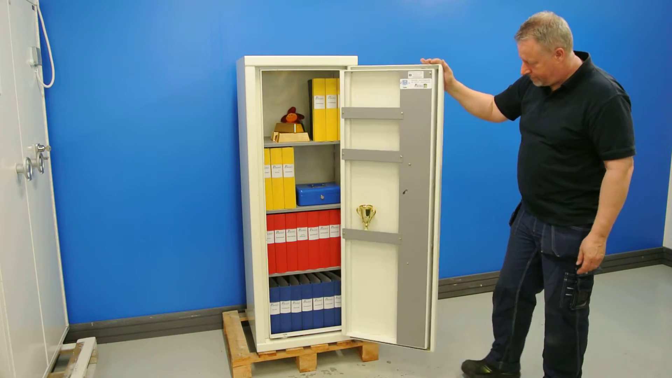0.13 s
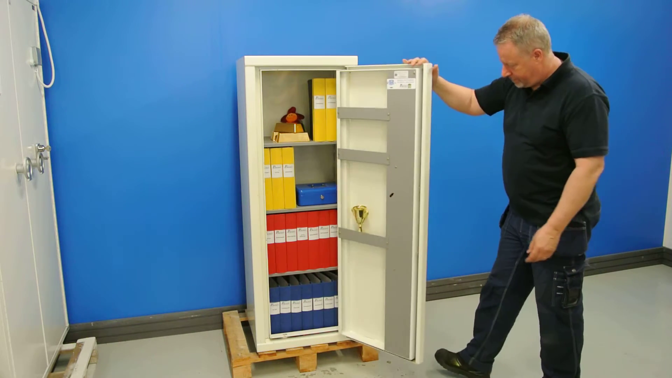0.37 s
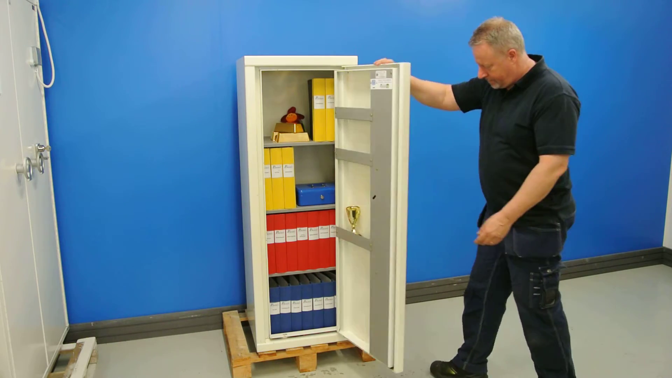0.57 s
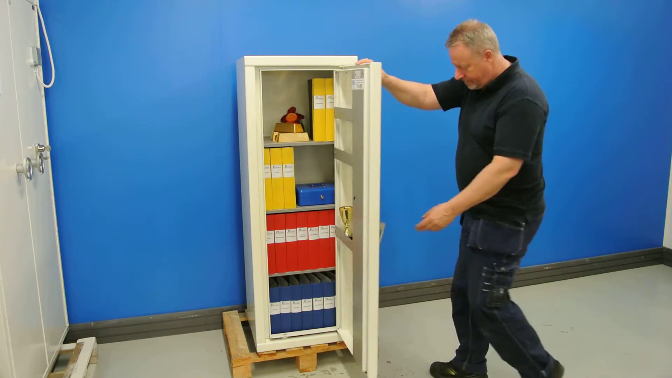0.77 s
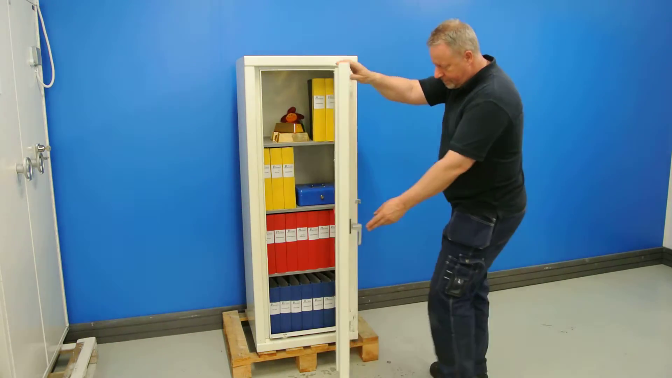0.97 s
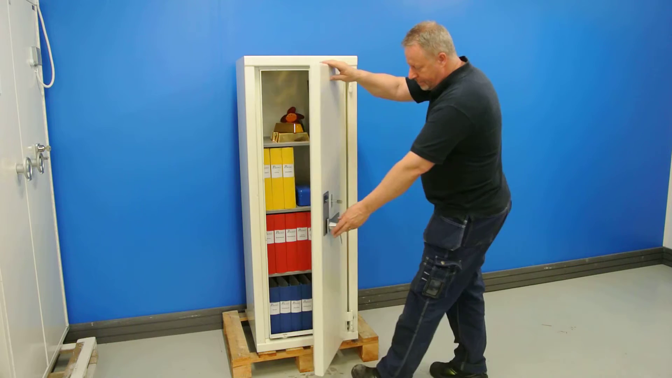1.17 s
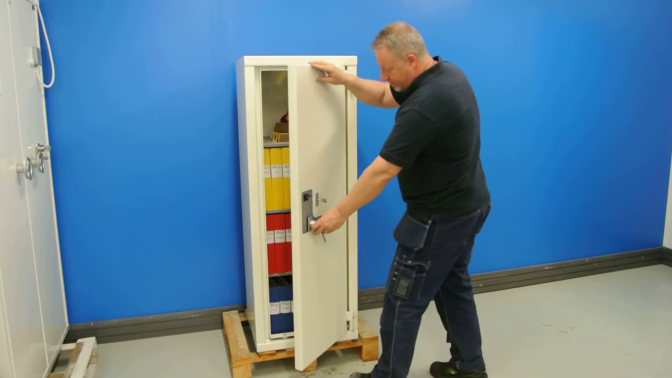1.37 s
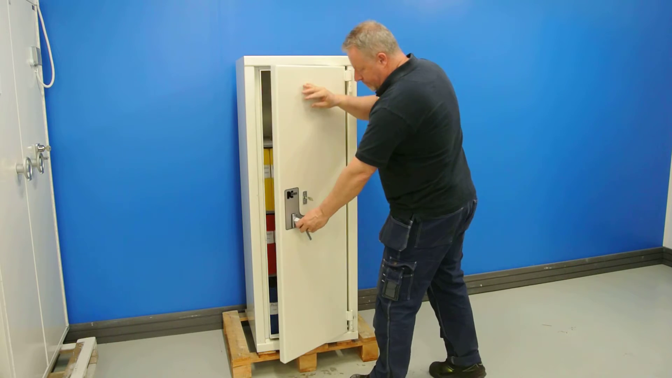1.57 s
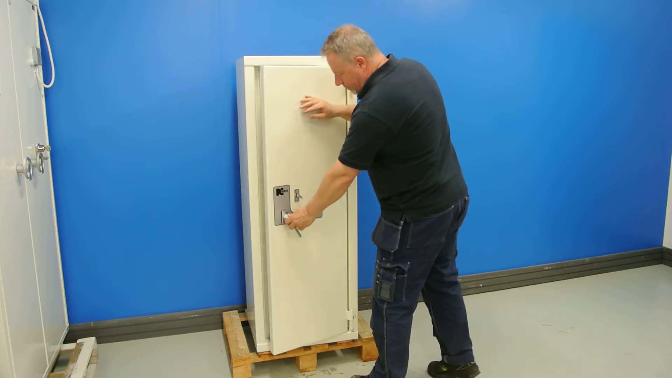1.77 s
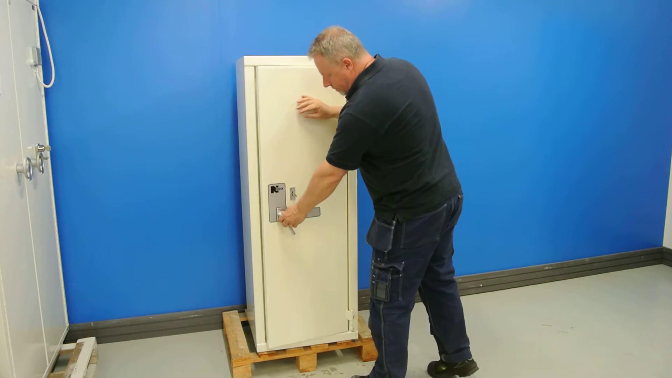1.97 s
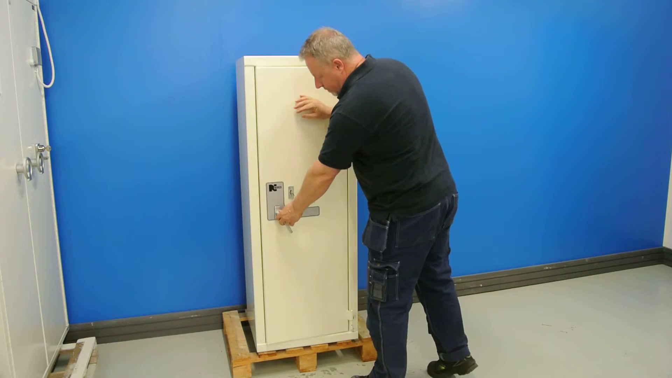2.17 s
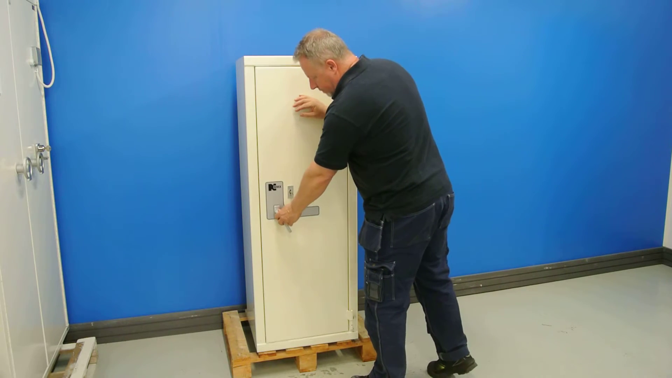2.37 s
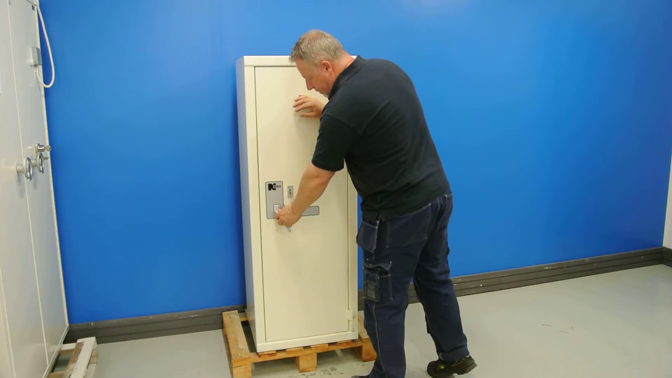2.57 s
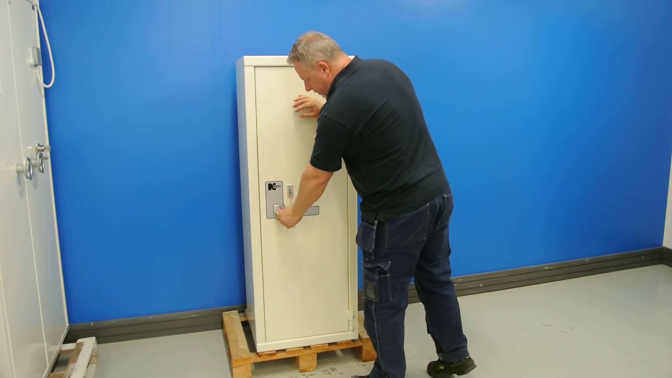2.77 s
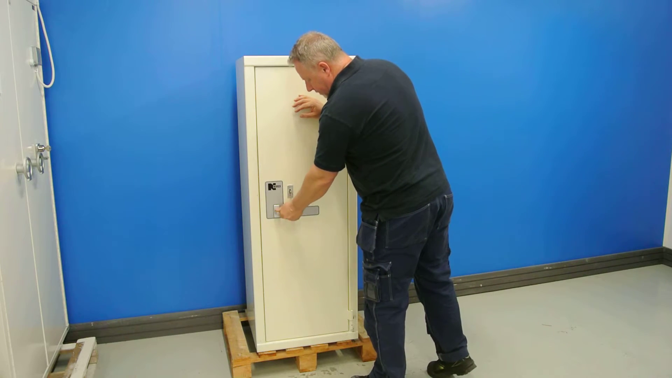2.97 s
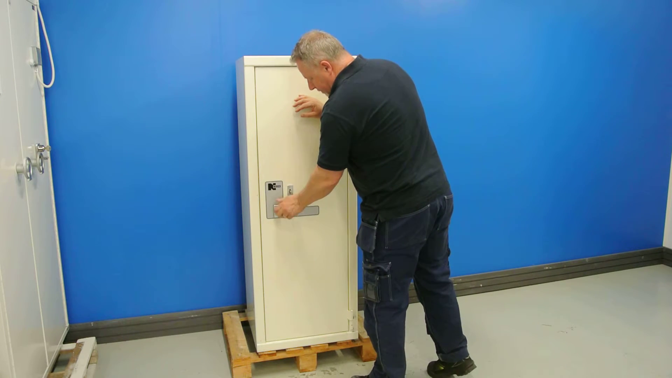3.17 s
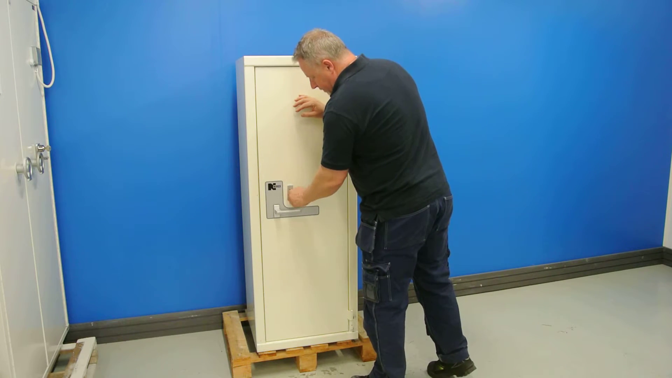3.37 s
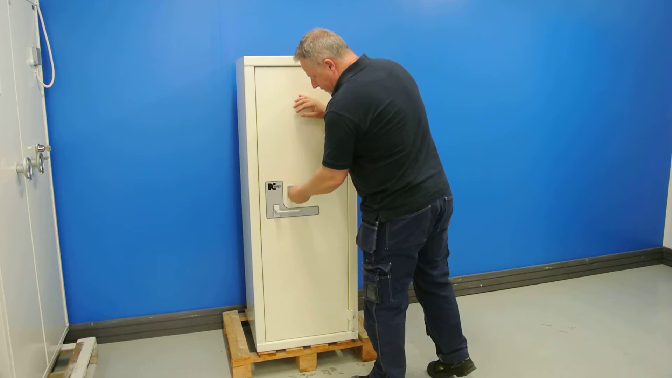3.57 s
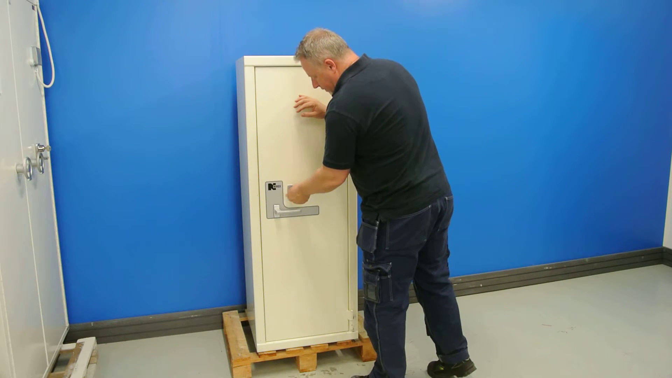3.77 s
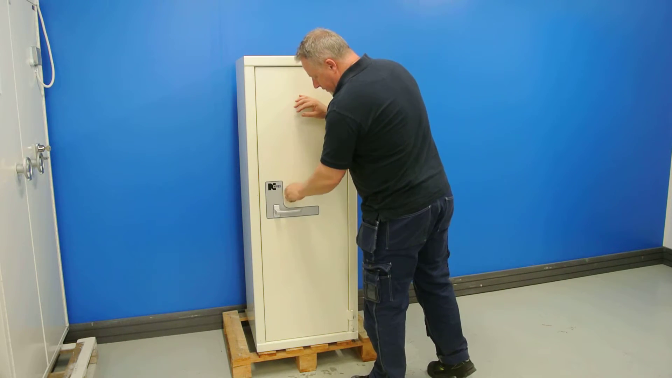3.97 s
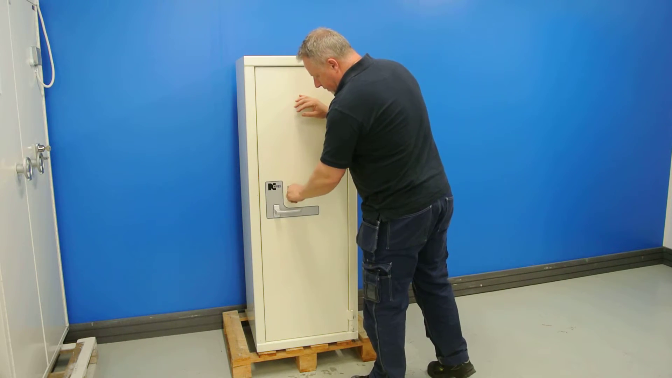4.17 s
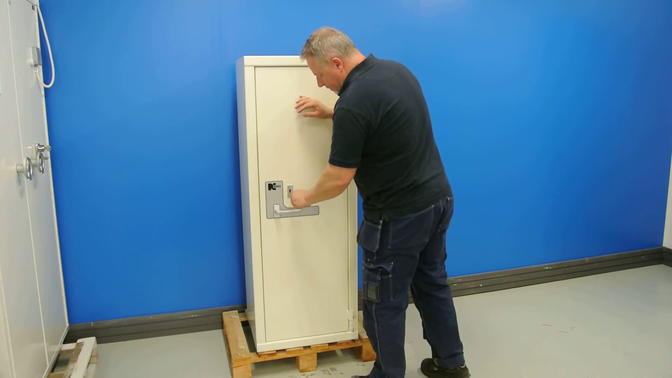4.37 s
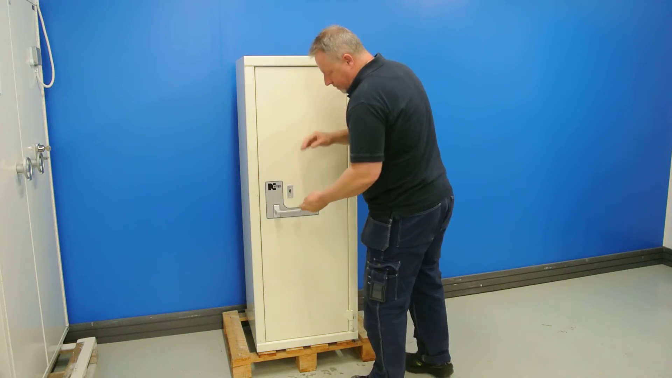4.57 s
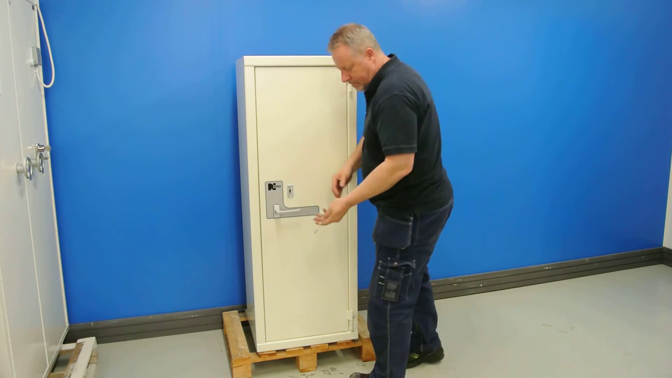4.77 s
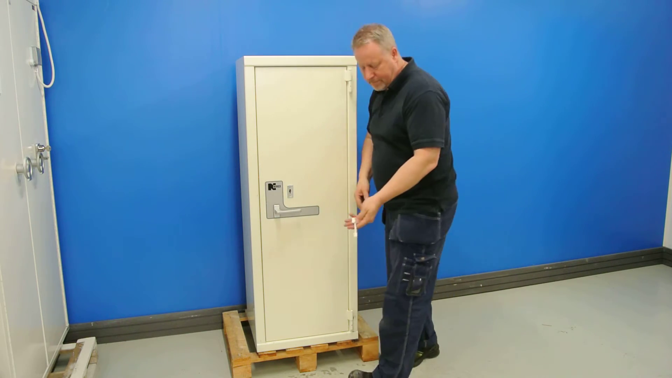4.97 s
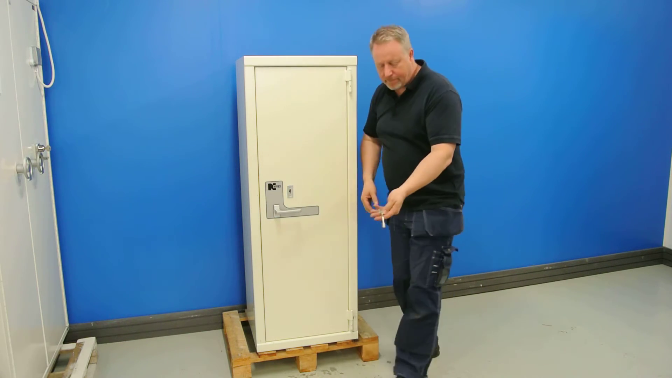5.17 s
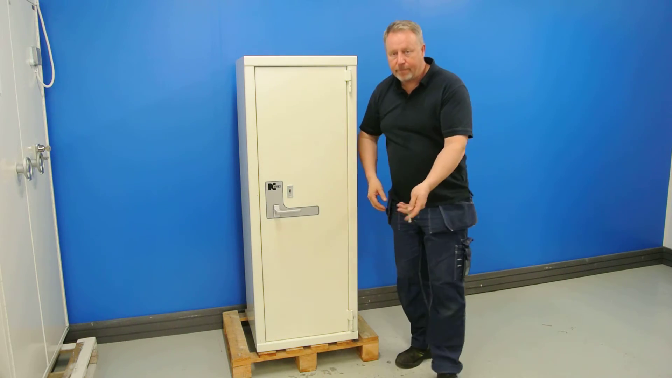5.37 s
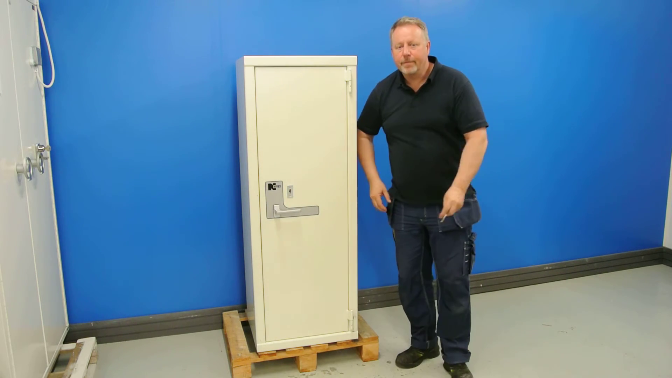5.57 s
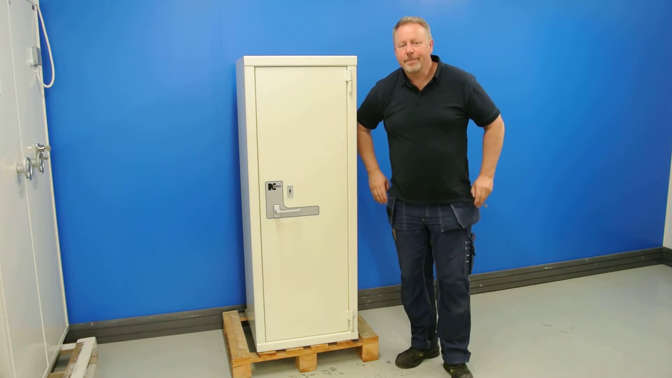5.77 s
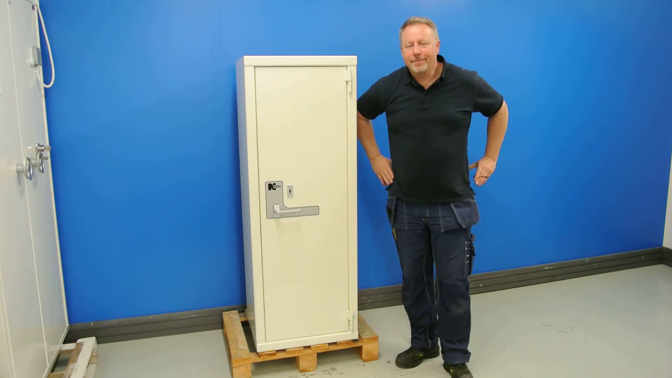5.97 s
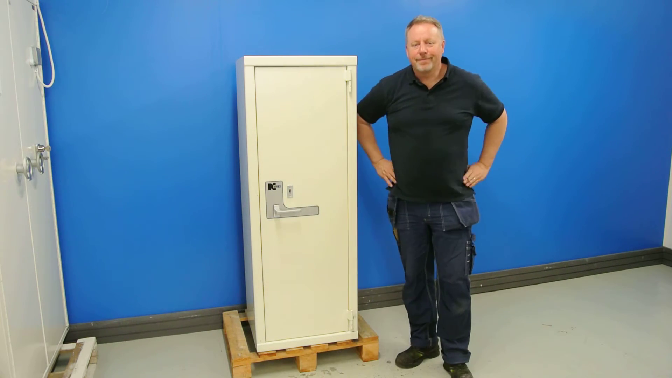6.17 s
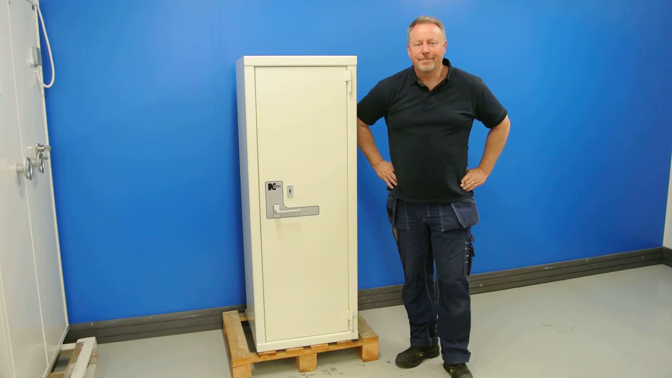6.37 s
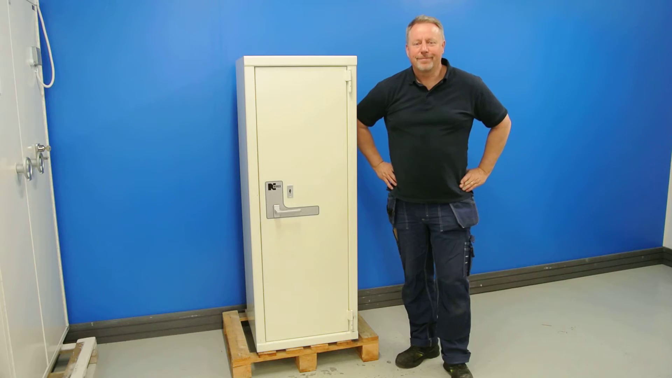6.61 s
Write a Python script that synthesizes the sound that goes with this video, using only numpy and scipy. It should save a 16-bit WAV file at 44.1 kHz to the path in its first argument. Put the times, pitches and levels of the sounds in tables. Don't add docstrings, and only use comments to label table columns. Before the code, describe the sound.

A bare, hard workshop with low ventilation, faint fan hum and slight hiss, heard in stereo from a few metres. Clothes rustle and boots tread softly; around 0.6-0.8 s a heel lands and a sole scuffs with a brief climbing squeal. A loose handle knocks at 1.0 and 1.3 s, with faint drags until a near-quiet pause. At 2.7 s the heavy steel door slams, rattling and bouncing for 0.15 s, sheets ringing and air thumping. At 3.0 s the bolts shoot home in the loudest, sharpest metallic crash, with about a second of room echo. Smaller linkage clacks come at 3.4 and 3.5-3.6 s. A key clicks in at 4.0 s, tumblers tick from 4.15, and the lock snaps at 4.3 with a tiny high ring and dull thunk. From 4.8 to 5.8 s heels step, soles scuff grittily and cloth swishes, strongest near 5.5, then fade.

```python
import sys
import numpy as np
from scipy import signal
from scipy.fft import rfft, irfft, next_fast_len
from scipy.io import wavfile
from scipy.ndimage import uniform_filter1d

SR = 44100
rng = np.random.default_rng(int(sys.argv[2]) if len(sys.argv) > 2 else 0)


def volts_from_decibels(level):
    exponent = np.asarray(level, float) / 20
    return 10 ** exponent


def pcm_store(signal):
    levels = np.round(np.clip(np.atleast_2d(signal), -1, 1) * 32767)
    wavfile.write(sys.argv[1], SR, levels.astype(np.int16).T)


N = 292905
SIZE = next_fast_len(N + 2 * SR)
HZ = np.arange(SIZE // 2 + 1) * SR / SIZE + 1e-3
TIME = np.arange(N) / SR

# t/s, bolt work level/dB, panel level/dB, small part level/dB
SLAM = [
    (2.704, -10.5, -8, -33),
    (2.7115, -17, -24, -34),
    (2.7455, -37, -20, -42),
    (2.761, -22, -43, -35),
    (2.7925, -33, -13, -46),
    (2.8242, -21, -17, -50),
    (2.8572, -49, -19.5, -54),
]
BOLT_SHOT = [
    (2.990, -1.5, -11, -5),
    (3.014, -20, -20.5, -28),
]
BOLTS = [
    (3.3608, -59, -38.5, -30),
    (3.3735, -27.5, -43, -25),
    (3.5215, -24, -51, -24.5),
    (3.5368, -18, -33, -44),
    (3.5474, -21, -32, -43),
    (3.5932, -19.5, -30.5, -14),
    (3.6055, -22, -31, -21),
]
LOCK = [
    (4.0302, -25, -36.5, -16),
    (4.1365, -30.5, -36, -25.5),
    (4.1545, -32.5, -48, -19),
    (4.2083, -28, -48, -26.5),
    (4.2295, -29.5, -34, -24),
    (4.2626, -35, -50, -24),
    (4.2829, -50, -52, -14.5),
    (4.293, -40, -54, -22),
    (4.3008, -26.5, -49, -15.5),
    (4.3248, -37, -30, -13.5),
]
# t/s, level/dB
KEY_BLOWS = [
    (4.2908, -14.5),
]
DOOR_BLOWS = [
    (2.704, -29),
    (2.800, -30),
]
FRAME_BLOWS = [
    (3.600, -38.5),
    (4.328, -33),
]
THUNKS = [
    (3.597, -30),
    (4.326, -23.5),
    (4.342, -30),
]
HANDLE_KNOCKS = [
    (1.034, -29.5),
    (1.304, -28.5),
]
HANDLE_BLOWS = [
    (1.034, -41),
    (1.305, -41),
]
HEELS = [
    (0.628, -39.5),
    (4.842, -32),
    (5.364, -35.5),
    (5.5, -39),
    (5.769, -43),
]
AIR_PUSHES = [
    (1.09, -51),
    (1.34, -50),
    (2.700, -26.5),
    (2.83, -56),
    (3.12, -48),
    (3.62, -51),
    (4.24, -42),
    (4.37, -46),
]

# f/Hz, width/Hz, level/dB
BOLT_MODES = [(1853, 57, 4.7), (2460, 29, 2.2), (3220, 240, 1.1), (4156, 41, 13)]
PANEL_MODES = [(287, 16, -21), (320, 5.2, -29), (537, 290, -8), (562, 13, 7), (695, 93, -13), (866, 26, -3),
               (1023, 140, 4.5), (1317, 37, 8.5)]
PART_MODES = [(6280, 1800, -4), (8350, 160, -28), (10860, 340, -13)]
THUNK_MODES = [(172, 22, 3.5), (357, 12.5, 5.5), (550, 48, -10), (765, 51, 8), (830, 160, 1.5),
               (1070, 37, 7), (1770, 59, -4)]
HANDLE_MODES = [(418, 33, 0.5), (700, 32, 7), (1075, 136, 6), (1400, 100, 5.5), (1770, 69, -1.5),
                (2540, 210, 3.5), (3180, 56, -21), (4310, 61, 1)]
HEEL_MODES = [(243, 86, 3.6), (490, 120, 7.2)]
# low f/Hz, high f/Hz, level/dB
BOLT_BROAD = (1570, 6460, 4.6)
PANEL_BROAD = (162, 2570, 1)
PART_BROAD = (7350, 36000, -0.81)
THUNK_BROAD = (230, 3100, -3.5)
HANDLE_BROAD = (270, 12000, -8)
HEEL_BROAD = (330, 1600, 0)
# f/Hz, level/dB, t60/s
DOOR_RING = [(272, 1, 0.19), (316, -6, 0.54), (357, -7, 0.69), (437, -3, 0.46), (561, -0.5, 1),
             (611, -4, 0.91), (740, -18, 0.5), (860, 5, 1), (966, 0, 0.57), (1087, 1.5, 0.59),
             (1130, -17, 1), (1267, -8, 0.75)]
FRAME_RING = [(170.8, -13, 0.47), (367.4, -0.5, 0.39), (440, -8, 0.4), (710, -4.5, 0.6), (760, -6, 0.62),
              (802, -5.5, 0.48), (843, -1, 0.46), (875, -9, 0.48), (950, -2, 0.28)]
HANDLE_RING = [(680, -1, 0.15), (1090, -1, 0.084), (1180, -10, 0.088), (1330, 0, 0.21), (1864, 7, 0.072),
               (2560, 5, 0.07)]
KEY_RING = [(9790, 0, .075), (9908, 0, .075)]
AIR_RING = [(40, -9, .25), (64.5, 5, 0.15), (80.4, -2, 0.33), (127.8, -6, 0.55)]

# full at t/s, swell/s, held/s, level/dB, grit centre f/Hz
SOLES = [
    (0.699, 0.15, 0.04, -35.5, 2500),
    (1.72, 0.37, 0.023, -52, 2600),
    (1.959, 0.054, 0.016, -54, 2750),
    (2.23, .1, .01, -61, 2900),
    (5.021, 0.32, 0.15, -47.5, 2900),
    (5.287, 0.038, 0.014, -36.5, 3800),
    (5.381, 0.11, 0.019, -44, 4200),
    (5.50, .11, 0.041, -33.5, 3000),
    (5.77, .03, .01, -54, 2600),
    (6.17, 0.27, .03, -55, 2900),
]
# t/s, f/Hz, level/dB
TWIST = [
    (.60, 250, -70),
    (.63, 290, -45),
    (.68, 600, -44),
    (.72, 950, -44),
    (.745, 1500, -42),
    (.765, 1900, -38),
    (.80, 2000, -47),
    (.86, 2000, -70),
]
# full at t/s, swell/s, held/s, level/dB
TREADS = [(0.42, 0.32, .15, -52.5), (0.76, 0.068, 0.022, -43.5), (1.12, 0.15, 0.26, -53.5),
          (1.65, 0.09, 0.19, -54.5), (2.2, .3, 0.086, -61.5), (4.9, .1, .08, -55), (5.07, .2, .04, -48),
          (5.30, 0.061, 0.07, -48.5), (5.49, 0.091, 0.051, -39), (5.8, .2, 0.044, -58),
          (6.1, 0.46, 0.13, -52.5)]
# full at t/s, swell/s, held/s, level/dB, left minus right level/dB
CLOTH = [(0.05, 0.36, .3, -54, 0.3), (0.53, 0.44, 0.064, -44, 2), (0.75, 0.27, 0.014, -41.5, 13),
         (1.10, 0.9, .14, -48, 4), (1.33, .3, 0.084, -45, 6), (1.65, 0.72, 0.3, -50, 4),
         (2.00, .3, 0.025, -68, 0.4), (2.36, .1, .015, -71, -0.6), (4.62, 0.37, 0.11, -54.5, 0.6),
         (4.87, 0.33, 0.051, -48, 2), (5.086, 0.23, 0.023, -37, 9), (5.286, 0.1, 0.089, -37, 12),
         (5.49, .15, 0.036, -34, 11.5), (5.78, 0.21, 0.043, -49, 5), (6.05, 0.73, .2, -47, 0)]
# f/Hz, t60/s, likeness of left and right/0-1, level/dB
ROOM = [(60, 0.95, 0.93, 8), (162, 1, 0.9, 3), (340, 0.76, 0.87, 4.5), (824, 1, 0.78, 3),
        (1910, 0.92, 0.48, 4), (3700, 0.65, 0, 5), (5800, 0.61, 0, 1.5), (10500, 0.46, 0, 1),
        (14200, 0.23, 0, 0.5), (15600, .25, .1, -27)]
# f/Hz, level per Hz/dB
FLOOR = [(15, -50), (25, -20), (141, -10), (166, -15.5), (195, -5), (223, -10.5), (301, -11), (394, -9.5),
         (439, -8.5), (476, -12), (695, -13.5), (796, -16), (887, -14), (2160, -22), (16000, -27)]
# f/Hz, side minus mid level/dB
FLOOR_SIDE = [(60, -8), (110, -11), (200, -8.5), (380, -9), (700, -5), (1290, -2.5), (2380, 0), (4400, 2),
              (8120, 1.5), (15000, 3.5)]

SOLE_PAN_DB = -7
ROOM_DB, ROOM_RISE_S = 3, 0.0091
FLOOR_DB = -51.5
HUM_HZ, HUM_WIDTH_HZ, HUM_DB = 190.05, 4.5, -60


def cabinet(events, pan_db, contact_s):
    s, bolt_db, panel_db, part_db = np.transpose(events)
    bolts = strike(s, bolt_db, pan_db, contact_s, body(BOLT_MODES, BOLT_BROAD), rough_db=0.6)
    panels = strike(s, panel_db, 0.27 * pan_db, 1.43 * contact_s, body(PANEL_MODES, PANEL_BROAD), rough_db=-0.1)
    parts = strike(s, part_db, 4.1 * pan_db, 0.72 * contact_s, body(PART_MODES, PART_BROAD),
                   rough_db=1.8, rise_s=0.0032)
    blow_top = 1 / np.sqrt(1 + (HZ / 13900) ** 24)
    return filtered(bolts + panels + parts, blow_top)


def strike(times, dbs, pan_db, contact_s, response, rough_db, rise_s=0.0053):
    out = np.zeros((3, N))
    t = TIME[:SR // 3]
    shape = (1 - np.exp(-(t / rise_s) ** 2)) * np.exp(-t / contact_s)
    pan = np.array([[pan_db], [-pan_db]]) / 2
    for s, db in zip(times, dbs):
        start = int((s - rise_s) * SR)
        out[:2, start:start + len(t)] += shape * volts_from_decibels(db + pan)
        out[2, int(s * SR)] += volts_from_decibels(db) * np.sqrt(np.sum(shape ** 2))
    out[:2] *= grit(rough_db)
    return filtered(out, response)


def body(modes, broad):
    low_hz, high_hz, broad_db = broad
    response = volts_from_decibels(broad_db) * band(low_hz, high_hz)
    for k, (f, width, db) in enumerate(modes):
        response = response + (-1) ** k * volts_from_decibels(db) / (1 + 1j * (HZ ** 2 - f ** 2) / (HZ * width))
    return unit(response)


def grit(rough_db):
    grain_db = rough_db * np.repeat(rng.exponential(size=N // 16 + 1), 16)[:N]
    x = rng.standard_normal(N) * volts_from_decibels(grain_db)
    return x / x.std()


def filtered(x, response):
    return irfft(rfft(x, SIZE) * response, SIZE)[..., :N]


def band(lo_hz, hi_hz):
    low_cut = 1 + np.sqrt(2) * lo_hz / (1j * HZ) - (lo_hz / HZ) ** 2
    high_cut = 1 + 1j * np.sqrt(2) * HZ / hi_hz - (HZ / hi_hz) ** 2
    return 1 / low_cut / high_cut


def unit(response):
    return response / np.sqrt(np.mean(np.abs(response) ** 2))


def ring(blows, modes, push_s, pan_db, flutter_hz=0):
    t = TIME[:SR]
    tones = 0
    for k, (f, db, t60) in enumerate(modes):
        rates = flutter_hz * rng.uniform(.6, 1.4, (2, 1))
        beat = 1 + .7 * np.sin(2 * np.pi * rates * t).prod(axis=0)
        decay = volts_from_decibels(db - 60 * t / min(t60, .85))
        tones = tones + (-1) ** k * beat * decay * np.sin(2 * np.pi * f * t)
    tones = tones * (1 - np.exp(-t / push_s))
    out = np.zeros(N + SR)
    for s, db in blows:
        start = int(s * SR)
        out[start:start + SR] += volts_from_decibels(db) * tones
    return out[:N] * volts_from_decibels(np.array([[pan_db], [-pan_db], [0]]) / 2)


def knocks(events, modes, broad, pan_db, contact_s):
    s, db = np.transpose(events)
    return strike(s, db, pan_db, contact_s, body(modes, broad), rough_db=0.7, rise_s=0.0048)


def soles():
    s, swell, held, db, centre_hz = np.transpose(SOLES)
    rumble = filtered(grit(1.15), unit(band(300, 1500)))
    scrape = filtered(grit(1.15), unit(band(1400, 5500)))
    hiss = filtered(grit(1.15), unit(band(5000, 15500)))
    colour = carried(np.interp(TIME, s, centre_hz), width_hz=3750)
    drag = volts_from_decibels(-7.5) * scrape + volts_from_decibels(-1.5) * colour + volts_from_decibels(-32) * rumble + volts_from_decibels(-7) * hiss
    return drag * rubbing(s, swell, held, db, SOLE_PAN_DB, fade_db_s=198)


def treads():
    crunch = filtered(grit(1.3), unit(band(360, 1660)))
    return crunch * rubbing(*np.transpose(TREADS), SOLE_PAN_DB, fade_db_s=139)


def twist():
    s, hz, db = np.transpose(TWIST)
    return volts_from_decibels(np.interp(TIME, s, db, -120, -120)) * carried(np.interp(TIME, s, hz), width_hz=320)


def cloth():
    rumble = filtered(grit(1.15), unit(band(300, 1500)))
    broad = filtered(grit(1.15), unit(band(1400, 5500)))
    hiss = filtered(grit(1.15), unit(band(5000, 15500)))
    rustle = hiss + volts_from_decibels(-15) * rumble + volts_from_decibels(-7.5) * broad
    return rustle * rubbing(*np.transpose(CLOTH), fade_db_s=147)


def carried(hz, width_hz):
    span = int(SR / width_hz)
    slow = uniform_filter1d(uniform_filter1d(rng.standard_normal((2, N)), span), span)
    phase = 2 * np.pi * np.cumsum(hz) / SR
    return (slow[0] * np.cos(phase) + slow[1] * np.sin(phase)) / slow.std()


def rubbing(times, swells, helds, dbs, pans_db, fade_db_s):
    power = 0
    for s, swell, held, peak_db, pan_db in np.broadcast(times, swells, helds, dbs, pans_db):
        rise_db = 30 * np.clip((s - TIME) / swell, 0, None)
        fade_db = fade_db_s * np.clip(TIME - s - held, 0, None)
        power = power + volts_from_decibels(2 * (peak_db - rise_db - fade_db) + np.array([[pan_db], [-pan_db]]))
    return np.sqrt(power)


def room():
    t = np.arange(int(1.5 * SR)) / SR
    centres = np.log([row[0] for row in ROOM])
    out = 0
    for k, (_, t60, like, db) in enumerate(ROOM):
        share = np.sqrt(np.interp(np.log(HZ), centres, np.arange(len(ROOM)) == k))
        shape = (1 - np.exp(-(t / ROOM_RISE_S) ** 2)) * volts_from_decibels(-60 * t / t60)
        shape = shape / np.sqrt(np.sum(shape ** 2))
        mid, side = rfft(rng.standard_normal((2, len(t))) * shape, SIZE)
        side = side * np.array([[1], [-1]])
        out = out + volts_from_decibels(db) * share * (np.sqrt((1 + like) / 2) * mid + np.sqrt((1 - like) / 2) * side)
    return out


def floor():
    mid, side, hum = rng.standard_normal((3, N))
    mid_db = on_log(FLOOR)
    mid = filtered(mid, volts_from_decibels(mid_db))
    side = filtered(side, volts_from_decibels(mid_db + on_log(FLOOR_SIDE)))
    hum = filtered(hum, unit(1 / (1 + (2 * (HZ - HUM_HZ) / HUM_WIDTH_HZ) ** 2)))
    return (mid + side * np.array([[1], [-1]])) * volts_from_decibels(FLOOR_DB) / mid.std() + volts_from_decibels(HUM_DB) * hum


def on_log(table):
    hz, db = np.transpose(table)
    return np.interp(np.log(HZ), np.log(hz), db)


def scene():
    door = cabinet(SLAM, pan_db=7.5, contact_s=0.0077)
    door += knocks(HANDLE_KNOCKS, HANDLE_MODES, HANDLE_BROAD, pan_db=5.0, contact_s=0.012)
    frame = cabinet(BOLT_SHOT, pan_db=1.5, contact_s=0.0059)
    frame += cabinet(BOLTS, pan_db=2, contact_s=0.0094)
    frame += knocks(HEELS, HEEL_MODES, HEEL_BROAD, pan_db=-1.0, contact_s=0.0096)
    lock = cabinet(LOCK, pan_db=2, contact_s=0.012)
    lock += knocks(THUNKS, THUNK_MODES, THUNK_BROAD, pan_db=0.0, contact_s=0.016)

    sheets = ring(DOOR_BLOWS, DOOR_RING, push_s=0.0016, pan_db=-3.0, flutter_hz=10.8)
    sheets += ring(FRAME_BLOWS, FRAME_RING, push_s=0.0052, pan_db=3.5, flutter_hz=3.6)
    sheets += ring(HANDLE_BLOWS, HANDLE_RING, push_s=0.0013, pan_db=5.0)
    key = ring(KEY_BLOWS, KEY_RING, push_s=.0004, pan_db=7.)
    air = ring(AIR_PUSHES, AIR_RING, push_s=0.02, pan_db=1.0)
    slides = soles() + treads() + twist() + cloth()

    out = (sheets + air + key)[:2] + volts_from_decibels(-4.5) * slides + floor()
    lock[2] += volts_from_decibels(-22) * key[2]
    door[2] += volts_from_decibels(-10.5) * slides.mean(axis=0) + volts_from_decibels(-15.5) * (sheets + air)[2]
    for spot in (door, frame, lock):
        out = out + spot[:2] + volts_from_decibels(ROOM_DB) * filtered(spot[2], room())
    return out


def band_limit(x):
    return signal.sosfilt(signal.butter(12, 16640, fs=SR, output="sos"), x)


def record(dry):
    rounded = np.tanh(.4 * dry) / .4
    top_cut = signal.ellip(8, .2, 60, 15850, fs=SR, output="sos")
    mix = signal.sosfilt(top_cut, rounded)
    return band_limit(mix)


dry = scene()
out = record(dry)
pcm_store(out)
```